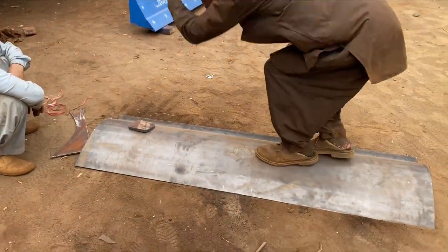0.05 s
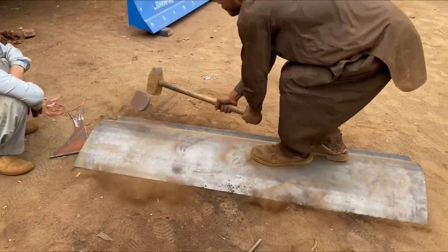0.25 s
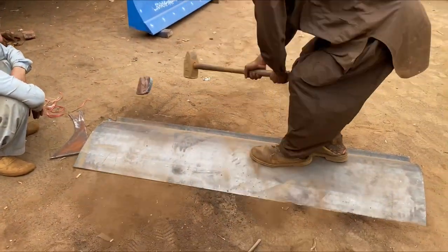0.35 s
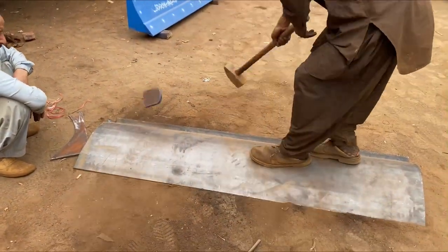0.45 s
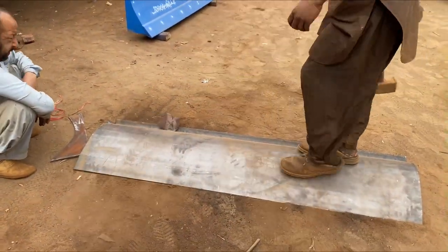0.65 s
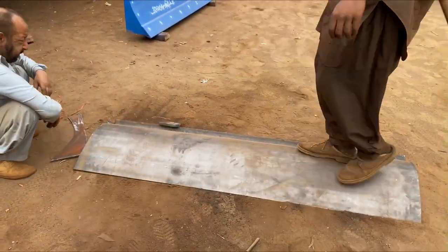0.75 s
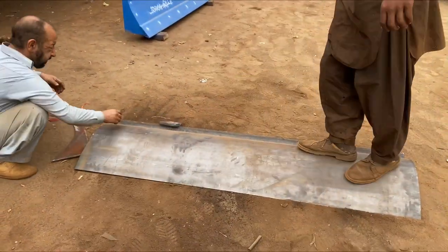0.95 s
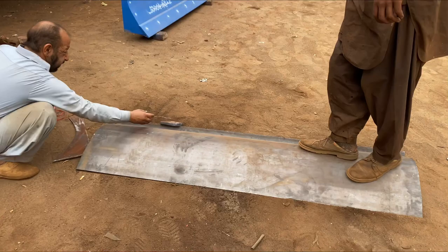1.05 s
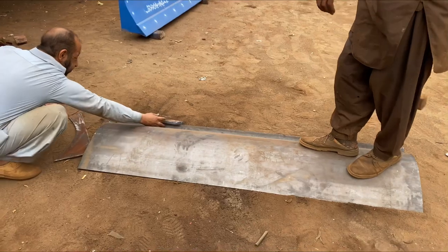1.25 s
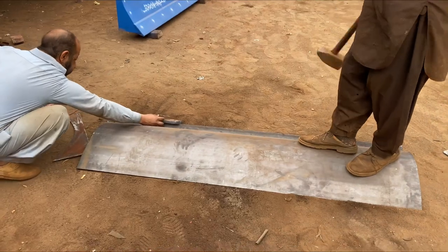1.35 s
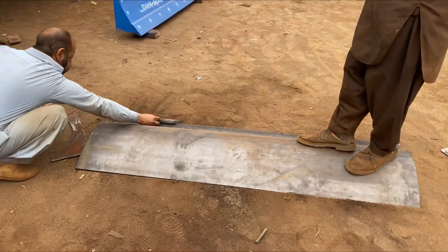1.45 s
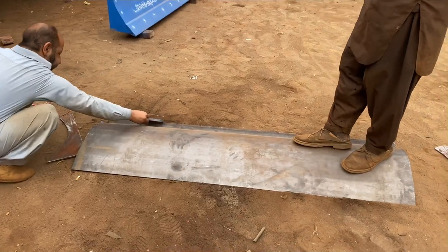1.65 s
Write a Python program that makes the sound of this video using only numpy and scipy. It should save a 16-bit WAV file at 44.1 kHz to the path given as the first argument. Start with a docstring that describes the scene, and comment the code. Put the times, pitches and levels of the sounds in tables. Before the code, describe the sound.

One loud sledgehammer blow on a steel block over a curved plate, cracking, booming and clanging; the block rings through the air, clatters down and bounces, in an open yard, close stereo microphone.

```python
"""First comes the low rumble of an open yard, with a machine droning far off and a faint shuffle of shoes.
A sledgehammer hits a small steel block on a long curved steel plate: the plate cracks, booms and clangs.
The block spins through the air ringing, lands with a clatter and bounces; later a hand nudges it along.
Struck steel is made from shaped noise and dying sine waves, the yard's echo from a fading noise tail,
and the background and squeaks from filtered noise."""
import sys
import numpy as np
from scipy import signal
from scipy.fft import irfft
from scipy.io import wavfile
from scipy.ndimage import uniform_filter1d

SR = 44100
rng = np.random.default_rng(int(sys.argv[2]) if len(sys.argv) > 2 else 0)


def dump_mix(stems):
    """Bounce the given channels to the path in sys.argv[1] as a 16-bit WAV at rate SR."""
    frames = np.atleast_2d(stems).T  # one column per channel
    limited = np.clip(frames, -1, 1)  # hard clip at full scale
    pcm = np.round(limited * 32767).astype(np.int16)
    wavfile.write(sys.argv[1], SR, pcm)


N = 74970
TIME = np.arange(N) / SR
BAND_CENTRES_HZ = 31.25 * 2 ** (np.arange(19) / 2)  # half an octave apart
RING_SIZE = 2 ** 15  # samples in one contact sound

# rumble of the yard: (frequency [Hz], level per octave [dB])
AMBIENCE = [(30, -64.5), (80, -61.5), (170, -53.5), (300, -65), (480, -62), (750, -74.5), (1400, -70),
            (3000, -79), (6000, -82.5), (10000, -88), (15000, -98.5)]
# how the rumble is raised and lowered: (time [s], level [dB])
AMBIENCE_LEVEL = [(0, 8.5), (.19, 9.5), (.45, 3.5), (.9, -2), (1.7, -1)]
# tones of the far machine: (frequency [Hz], level [dB])
DRONE = [(160, -64.5), (190, -57.5), (495, -71)]
DRONE_WIDTH_HZ = 9
# shoes shuffling on the dusty plate: (frequency [Hz], level per octave [dB])
SHUFFLE = [(100, -100), (1500, -82), (4800, -79), (9000, -88), (14000, -87)]
# how the shuffle is raised and lowered: (time [s], level [dB])
SHUFFLE_LEVEL = [(0, -21), (.15, -13), (.3, -20.5), (1.19, -18), (1.25, 1), (1.4, -4.5), (1.57, -0.5),
                 (1.61, 4), (1.7, 8.5)]
# how alike the two microphones are: (frequency [Hz], likeness [0-1])
LIKENESS = [(100, 0.95), (250, 0.92), (600, 0.6), (2000, 0.1), (12000, .3)]
RIGHT_LAG_S = .00025  # noise reaches the right side this much later

# treble swelling quickly up to the crack of the main blow:
# (time [s], level [dB], rise [s], dull above [Hz])
CRACK_SWELL = [(0.1932, -6, 0.0072, 7000), (0.198, 0.5, .004, 9000), (0.2023, -1, .0004, 20000)]
HIT_S = CRACK_SWELL[-1][0]  # the main blow
# plate slapping back on the sand: (time [s], level [dB], level of its boom [dB])
SLAPS = [(0.219, -3.5, -34.5), (0.267, -10.5, -26), (.322, -6, -33), (.366, -6.5, -30.5), (.43, -14.5, -36)]
SLAP_FIRST_HZ, SLAP_LAST_HZ, SLAP_T60_S = 166, 128, 0.2  # t60: time to fade by 60 dB
# the crowd of plate modes (ways the steel can vibrate) in each kind of contact, before that contact's
# own level: (frequency [Hz], level per octave [dB], t60 [s])
CRACK = [(40, -31, .1), (150, -24, .06), (350, -20.5, 0.014), (750, -13, 0.032), (1407, -7.5, .04),
         (2800, -21, .04), (6500, -1.5, .035), (10300, -16.5, 0.038), (15000, -19, .04)]
CLANG = [(40, -44.5, .15), (90, -32.5, 0.18), (171, -31.5, 0.4), (354, -34, .4), (700, -26, .35),
         (1200, -20, 0.17), (2800, -24, 0.36), (4200, -26, 0.3), (7000, -14, 0.16), (10600, -34, 0.27),
         (14000, -24, 0.24)]
SLAP = [(40, -57.5, .15), (87, -39.5, 0.45), (160, -36, 0.4), (350, -32, 0.16), (700, -34, .2),
        (1500, -36, 0.33), (4000, -34, 0.14), (12000, -57, .15)]
CLATTER = [(60, -58.5, .15), (201.4, -46, 0.12), (400, -38.5, 0.26), (730, -34, 0.19), (1346, -20.5, 0.17),
           (2640, -27, 0.19), (5000, -26.5, 0.21), (8040, -29, 0.17), (10900, -37, 0.11), (15000, -24, 0.1)]
THUD = [(40.1, -76.5, .2), (110.9, -52.5, 0.11), (172, -34.5, 0.17), (357, -33.5, 0.17), (559, -34.5, 0.1),
        (1185, -42, 0.12), (8000, -85, .1)]
# dry tick at each touch of the block: the same columns
TICK = [(101, -68.5, 0.046), (1030, -25, 0.086), (4800, -25, 0.11), (7840, -31, 0.027),
        (14800, -52.5, 0.017)]
SLEDGE_RISE_S, SLAP_RISE_S, THUD_RISE_S = 0.00017, 0.0062, 0.004
MODE_SPACING_HZ, MODE_SCATTER_DB = 19, 5.5
BEND_LAG_S = 0.0011  # lag of the bending wave at 1 kHz; lower waves travel slower
# booms of the bent plate springing back: (first pitch [Hz], last pitch [Hz], level [dB], t60 [s])
BOOMS = [(453.4, 368, -20, 0.24), (335, 285, -30.5, 0.36), (118, 95, -15, 0.097), (180, 150, -16.5, .085),
         (560, 515, -24, .08)]
SAG_S, BOOM_DELAY_S = 0.065, .005
# bending wave sweeping past, high notes first:
# (time [s], first pitch [Hz], last pitch [Hz], sweep [s], level [dB], time to its peak [s])
WHUMPS = [(0.2024, 720, 170, 0.0083, -12.5, 0.0067), (0.5462, 680, 197, 0.005, -25, .007)]
# the plate radiates weakly around this pitch; depth is 0-1
HOLLOW_HZ, HOLLOW_Q, HOLLOW_DEPTH = 826, 8.6, .6

# pitches of the plate's clear modes: (frequency [Hz])
PLATE_HZ = [143, 184, 353, 639, 730, 808, 1110, 1421, 1484, 1722, 1960, 2288, 2420, 2789, 3365, 3558, 3938,
            4266, 4762, 5195]
# for each in turn: (level under the sledge [dB], level under the block [dB], t60 [s], left over right [dB])
PLATE_MODES = [(-31.5, -45.5, 0.39, -2.5), (-26.5, -43.5, 0.19, -5), (-46.5, -43.5, .45, 0),
               (-27, -38.5, 0.25, -4.5), (-30.5, -48.5, .25, 1.5), (-33.5, -52.5, .25, 0.5),
               (-29, -41.5, 0.3, 5), (-44, -25.5, 0.47, 9.5), (-32, -41.5, 0.6, 4.5),
               (-37.5, -38.5, 0.35, 2.5), (-36.5, -41, .33, 0), (-34.5, -42, .33, -1), (-45, -35, 0.42, 1),
               (-37.5, -38.5, 0.33, -3), (-44, -33.5, .22, 1.5), (-43, -38, 0.28, -3), (-37, -58.5, .42, 3),
               (-42, -41, .28, -0.5), (-46, -37.5, 0.3, -3.5), (-46, -43.5, .25, 0)]
# from this time the plate's clear modes fade faster
FAST_FADE_S, FAST_FADE_DB_PER_S = 0.64, 53

# pitches of the block's modes: (frequency [Hz])
BLOCK_HZ = [5669, 6790, 7036, 10940, 14380]
# for each in turn: (level [dB], t60 in the air [s], left over right [dB], time facing the microphone [s])
BLOCK_MODES = [(-36, 1.05, -2, .38), (-39, .8, 2, .45), (-50, .7, 3, .42), (-54, 1.05, 4, .39),
               (-48, 1.2, -2, .41)]
SPIN_HZ, SPIN_DB, GRIP_T60_S = 2.6, 4, 0.25  # turns per second, swell either way, extra fade once landed
SPIN_SWING_HZ = 10  # pitch swing of the spinning block at 10 kHz
FLUTTER_HZ, FLUTTER_DB = 20, 3

# block touching the plate: (time [s], clatter level [dB], dull above [Hz], rise [s],
# level fed to the clear modes [dB], tick level [dB])
TOUCHES = [(.5465, -2.5, 9000, 0.0012, -10.5, -2.5), (.553, 2.5, 3100, 0.00098, -1, -7),
           (.564, -6, 14400, 0.0032, -5.5, -0.5), (.600, -12.5, 4870, 0.0073, -6.5, -16),
           (.690, -23.5, 8650, 0.0025, -20, -20.5), (.733, -20.5, 4000, 0.003, -35, -16),
           (.779, -25.5, 1800, 0.007, -18, -32)]
# the block's weight rocking the plate: (time [s], level [dB])
THUDS = [(0.551, -3.5), (0.6, -13), (0.693, -7.5), (.738, -7.5), (0.783, -8.5)]
# the plate's knock under the landing block: (first pitch [Hz], last pitch [Hz], level [dB], t60 [s])
KNOCK = [(211.5, 195, -31, .09), (588, 660, -30, 0.13)]
# the landing block wakes only a share of the modes above this pitch
BLOCK_MODE_SHARE, SPARSE_ABOVE_HZ = 0.49, 1500

# squeaks of the block grating as it slides: (frequency [Hz], level [dB])
SQUEAKS = [(3090, -85), (4264, -77.5), (5200, -78)]
SQUEAK_WIDTH_HZ = 22
# how the squeaks are raised and lowered: (time [s], level [dB])
SLIDE_LEVEL = [(1.2, -39.5), (1.3, -16), (1.58, -12.5), (1.6, 0), (1.65, -3), (1.7, -5.5)]
# pushed block catching on the plate: (time [s], clink level [dB], clink dull above [Hz], clatter level [dB])
CATCHES = [(1.591, 1, 9000, -32), (1.605, 1, 2000, -38), (1.653, -3, 6000, -40), (1.670, 8, 2000, -33),
           (1.690, 11, 5000, -28)]
CATCH_RISE_S, CATCH_DULL_HZ = .003, 1700
# block and plate clinking together, before each catch's own level: (frequency [Hz], level [dB], t60 [s])
CLINK = [(355, -61, .4), (1421, -63, .3), (1805, -71, .15), (1884, -67, .18), (2606, -68, .15),
         (3090, -68, .1), (3400, -73, .1), (4260, -74, .25)]

# reverberation of the yard: (frequency [Hz], level [dB], t60 [s])
YARD = [(60, -28, .65), (302, -20, .65), (1380, -18, .72), (4000, -18.5, 0.46), (8000, -27, 0.62),
        (15000, -27, .35)]
YARD_BUILD_S = .04
LOW_CUT_HZ, CUTOFF_HZ = 91, 15700


def amp(db):
    """Turn decibels into gain."""
    return 10 ** (np.asarray(db) / 20)


def at_hz(table, hz):
    """Read every column of a table at a frequency, on a log-frequency axis."""
    table_hz, *columns = np.transpose(table)
    return [np.interp(np.log(hz), np.log(table_hz), column) for column in columns]


def level_curve(table):
    """Gain over the whole scene, drawn through (time [s], level [dB]) points."""
    return amp(np.interp(TIME, *np.transpose(table)))


def add(out, s, x):
    """Mix a sound in at a given time."""
    start = int(s * SR)
    out[:, start:start + x.shape[1]] += x[:, :N - start]


def panned(db):
    """Left and right gains for a left-over-right difference."""
    return amp(np.array([[db], [-db]]) / 2)


def bands(size, weight=1):
    """Overlapping half-octave bands of stereo noise; an octave of them has an rms (average strength) of 1."""
    hz = np.arange(size // 2 + 1) * SR / size + 1e-3
    alike = np.clip(at_hz(LIKENESS, hz)[0], 0, 1)
    octave = np.log2(hz)
    mid, side = np.exp(2j * np.pi * rng.random((2, len(hz))))
    # the shared part goes to both sides, the rest in opposite directions
    both = weight * (np.sqrt(1 + alike) * mid + np.sqrt(1 - alike) * side * [[1], [-1]])
    both[1] *= np.exp(-2j * np.pi * hz * RIGHT_LAG_S)
    for centre in BAND_CENTRES_HZ:
        triangle = np.maximum(1 - 2 * abs(octave - np.log2(centre)), 0)
        x = irfft(both * triangle, size)
        yield centre, x / np.sqrt(3 * np.mean(x ** 2) + 1e-20)


def noise_bed(spectrum, level):
    """Smooth noise with a colour and a slowly changing level."""
    coloured = sum(amp(at_hz(spectrum, hz)[0]) * x for hz, x in bands(N))
    return level_curve(level) * coloured


def wavering(tones, width_hz):
    """Unsteady tones: noise held in narrow resonances."""
    out = 0
    grid = np.arange(N // 2 + 1) * SR / N
    for hz, db in tones:
        random_phase = np.exp(2j * np.pi * rng.random(len(grid)))
        x = irfft(random_phase / (1 + ((grid - hz) / width_hz) ** 2), N)
        out = out + amp(db) * x / x.std()
    return out


def background():
    """The yard's rumble and the shuffling shoes are shaped noise; the far machine is unsteady tones."""
    rumble = noise_bed(AMBIENCE, AMBIENCE_LEVEL)
    shuffle = noise_bed(SHUFFLE, SHUFFLE_LEVEL)
    return rumble + shuffle + wavering(DRONE, DRONE_WIDTH_HZ)


def crowd(mode_hz, table, rise_s, dull_hz=SR):
    """One contact rings the plate's crowd of modes, each with a new strength; the lows arrive later."""
    t = np.arange(RING_SIZE) / SR
    weight = np.full(RING_SIZE // 2 + 1, .02)  # a little sound between the modes
    mode_bins = np.clip(mode_hz * RING_SIZE / SR, 0, RING_SIZE // 2).astype(int)
    weight[mode_bins] = amp(rng.normal(0, MODE_SCATTER_DB, len(mode_hz)))
    out = 0
    for hz, x in bands(RING_SIZE, weight):
        db, t60 = at_hz(table, hz)
        lag = BEND_LAG_S * np.sqrt(10 ** 3 / hz)
        age = np.maximum(t - lag, 0)
        rise = np.minimum(age / (rise_s + lag / 2), 1)  # late waves also swell more slowly
        envelope = rise * amp(db - 60 * age / t60)
        out = out + x * envelope / np.hypot(1, hz / dull_hz)
    return out


def glide(first_hz, last_hz, glide_s):
    """A sine whose pitch slides from one value and settles at another."""
    hz = last_hz + (first_hz - last_hz) * np.exp(-TIME / glide_s)
    return np.sin(2 * np.pi * np.cumsum(hz)[None] / SR)


def boom(first_hz, last_hz, db, t60):
    """A low mode of the bent plate, its pitch shifting as it dies."""
    rise = np.minimum(TIME * first_hz, 1)
    return amp(db - 60 * TIME / t60) * rise * glide(first_hz, last_hz, SAG_S)


def sledge(mode_hz):
    """The blow: treble swelling into a crack, a clang with a sagging boom, and the plate slapping the sand."""
    out = np.zeros((2, N))
    for s, db, rise_s, dull_hz in CRACK_SWELL:
        add(out, s, amp(db) * crowd(mode_hz, CRACK, rise_s, dull_hz))
    add(out, HIT_S, crowd(mode_hz, CLANG, SLEDGE_RISE_S))
    for row in BOOMS:
        add(out, HIT_S + BOOM_DELAY_S, boom(*row))
    for s, db, boom_db in SLAPS:
        add(out, s, amp(db) * crowd(mode_hz, SLAP, SLAP_RISE_S))
        add(out, s, boom(SLAP_FIRST_HZ, SLAP_LAST_HZ, boom_db, SLAP_T60_S))
    return out


def whumps():
    """A few cycles of falling pitch as the first bending wave of a heavy hit runs along the plate."""
    out = np.zeros((2, N))
    for s, first_hz, last_hz, sweep_s, db, peak_s in WHUMPS:
        age = (TIME / peak_s) ** 2
        swell = age * np.exp(1 - np.minimum(age, 10 ** 2))  # reaches 1 at peak_s
        add(out, s, amp(db) * swell * glide(first_hz, last_hz, sweep_s))
    return out


def hollow(x):
    """The plate radiates weakly around one pitch, leaving a dip in its lower middle."""
    b, a = signal.iirpeak(HOLLOW_HZ, HOLLOW_Q, fs=SR)
    return x - np.clip(HOLLOW_DEPTH, 0, 1) * signal.lfilter(b, a, x)


def mode(hz, db, t60, pan_db, swing=0):
    """A dying sine that meets each microphone with its own phase, more so where the two are less alike."""
    spread = np.sqrt(1 - np.clip(at_hz(LIKENESS, hz)[0], 0, 1))
    phase = swing + rng.uniform(0, 2 * np.pi) + spread * rng.normal(size=(2, 1))
    rise = np.minimum(TIME * hz / 2, 1)  # two cycles
    envelope = panned(pan_db) * amp(db - 60 * TIME / t60) * rise
    return envelope * np.sin(2 * np.pi * hz * TIME + phase)


def plate_ring():
    """The plate's clear modes, struck by the sledge and fed again by every touch, later fading faster."""
    out, fed = np.zeros((2, N)), np.zeros(N)
    for s, _, _, _, ring_db, _ in TOUCHES:
        fed[int(s * SR)] = amp(ring_db) ** 2
    for hz, (sledge_db, block_db, t60, pan_db) in zip(PLATE_HZ, PLATE_MODES):
        add(out, HIT_S, mode(hz, sledge_db, t60, pan_db))
        # each touch adds energy, which then drains away
        energy = signal.lfilter([1], [1, -amp(-120 / (t60 * SR))], fed)
        strength = np.sqrt(abs(uniform_filter1d(energy, size=64)))
        out += strength * mode(hz, block_db, np.inf, pan_db)
    return out * amp(-FAST_FADE_DB_PER_S * np.maximum(TIME - FAST_FADE_S, 0))


def flying_block():
    """The block's high modes swell as they turn to the microphone, flutter unevenly, and are damped on landing."""
    out = np.zeros((2, N))
    for hz, (db, t60, pan_db, facing_s) in zip(BLOCK_HZ, BLOCK_MODES):
        turn = 2 * np.pi * SPIN_HZ * (TIME + HIT_S - facing_s)
        swing = SPIN_SWING_HZ / SPIN_HZ * hz / 10 ** 4 * np.sin(turn)
        flutter_db = FLUTTER_DB * wavering([(FLUTTER_HZ, 0)], FLUTTER_HZ)
        swell_db = SPIN_DB * (np.cos(2 * turn) - 1 / 2)  # two swells a turn
        add(out, HIT_S, mode(hz, db, t60, pan_db, swing) * amp(swell_db + flutter_db))
    landed_for = np.maximum(TIME - TOUCHES[0][0], 0)
    return out * amp(-60 * landed_for / GRIP_T60_S)


def landing_block(mode_hz):
    """The block knocks and clatters on the plate, bounces and settles."""
    chosen = rng.random(len(mode_hz)) < BLOCK_MODE_SHARE
    woken = mode_hz[chosen | (mode_hz < SPARSE_ABOVE_HZ)]
    out = np.zeros((2, N))
    tick = crowd(mode_hz, TICK, SLEDGE_RISE_S)  # the same tick at every touch
    for s, db, dull_hz, rise_s, _, tick_db in TOUCHES:
        clatter = amp(db) * crowd(woken, CLATTER, rise_s, dull_hz)
        add(out, s, clatter + amp(tick_db) * tick)
    for s, db in THUDS:
        add(out, s, amp(db) * crowd(mode_hz, THUD, THUD_RISE_S))
    for row in KNOCK:
        add(out, TOUCHES[1][0], boom(*row))
    return out


def yard(x):
    """Weak scattered reflections that build up and die away, each pitch at its own pace."""
    response = 0
    for hz, noise in bands(N):
        db, t60 = at_hz(YARD, hz)
        tail = noise * np.minimum(TIME / YARD_BUILD_S, 1) * amp(-60 * TIME / t60)
        tail_energy = np.mean(np.sum(tail ** 2, axis=1))
        response = response + amp(db) * tail * np.sqrt(hz / SR / tail_energy)
    return signal.fftconvolve(x, response, axes=1)[:, :N]


def sliding_block():
    """The block grates over the plate: unsteady squeaks that come and go."""
    return wavering(SQUEAKS, SQUEAK_WIDTH_HZ) * level_curve(SLIDE_LEVEL)


def nudged_block(mode_hz):
    """Pushed over the plate, the block catches and clinks, with a faint dull clatter."""
    out = np.zeros((2, N))
    for s, db, dull_hz, clatter_db in CATCHES:
        add(out, s, amp(clatter_db) * crowd(mode_hz, CLATTER, CATCH_RISE_S, CATCH_DULL_HZ))
        for hz, mode_db, t60 in CLINK:
            add(out, s, mode(hz, db + mode_db, t60, 0) / np.hypot(1, hz / dull_hz))
    return out


def scene():
    """Plate and block in the yard, over the background."""
    mode_hz = MODE_SPACING_HZ * (np.arange(1000) + 1 + rng.random(1000))
    contacts = sledge(mode_hz) + whumps() + landing_block(mode_hz) + nudged_block(mode_hz)
    impacts = hollow(contacts)
    ringing = plate_ring() + flying_block()
    return background() + impacts + yard(impacts) + ringing + sliding_block()


def record(dry):
    """The microphones shed the deep bass, the highest peaks are rounded and the top is cut."""
    low_cut = signal.butter(3, LOW_CUT_HZ, "high", fs=SR, output="sos")
    thin = signal.sosfilt(low_cut, dry)
    rounded = .95 * np.tanh(thin / .95)
    top_cut = signal.ellip(10, .2, 80, CUTOFF_HZ, fs=SR, output="sos")
    return signal.sosfilt(top_cut, rounded)


dry = scene()
out = record(dry)
dump_mix(out)
```